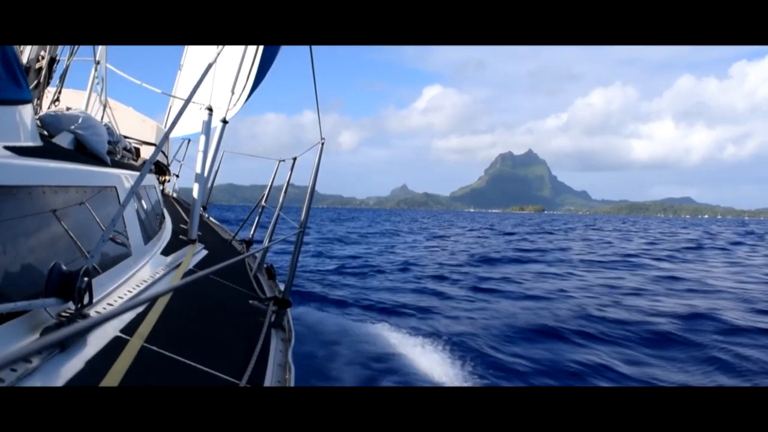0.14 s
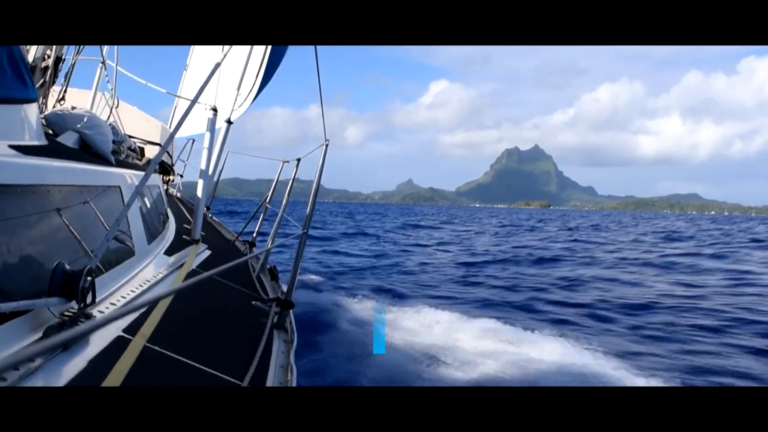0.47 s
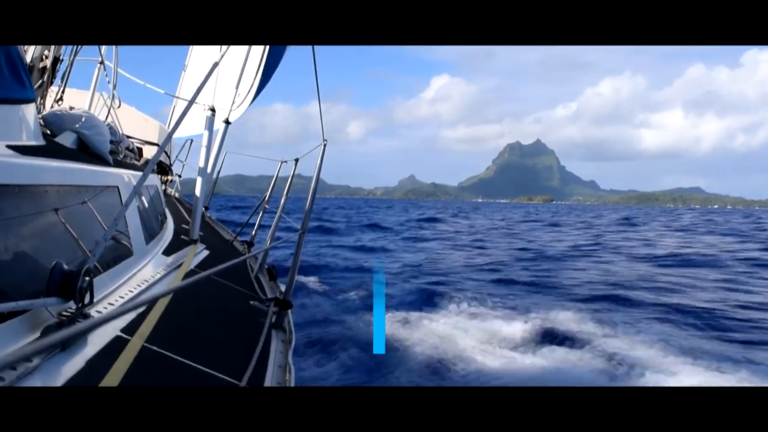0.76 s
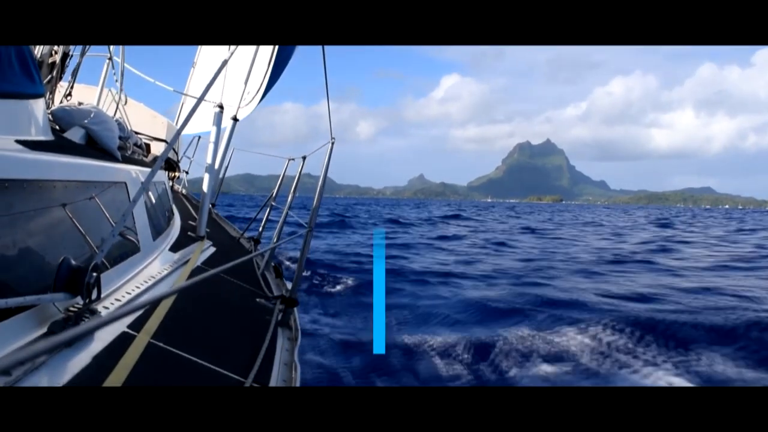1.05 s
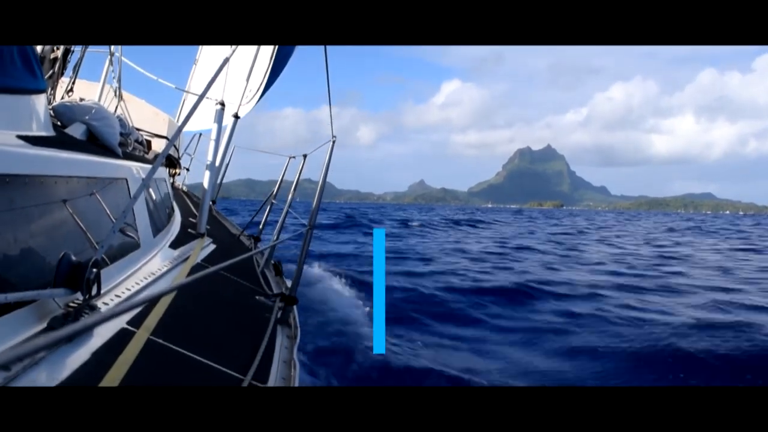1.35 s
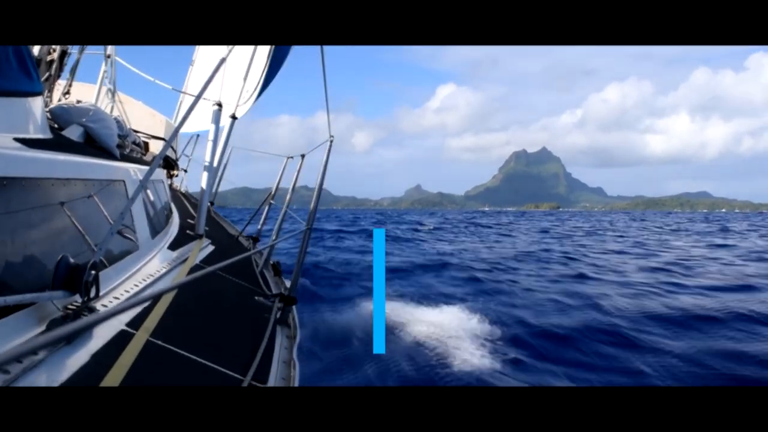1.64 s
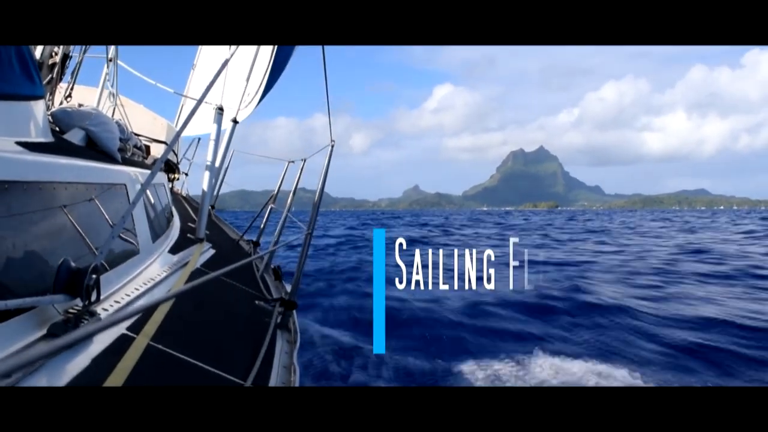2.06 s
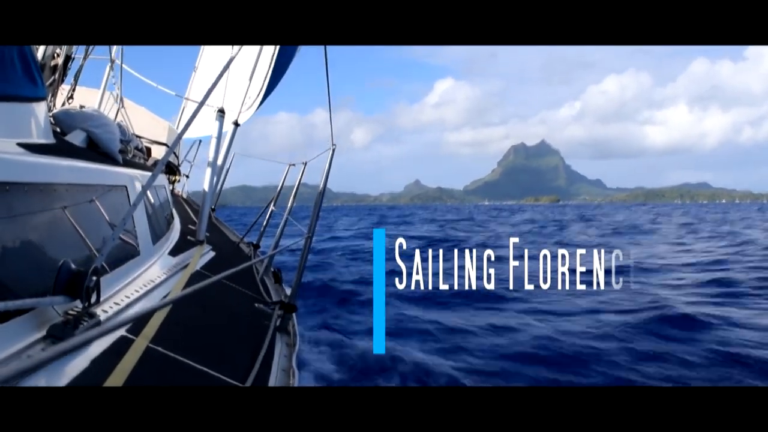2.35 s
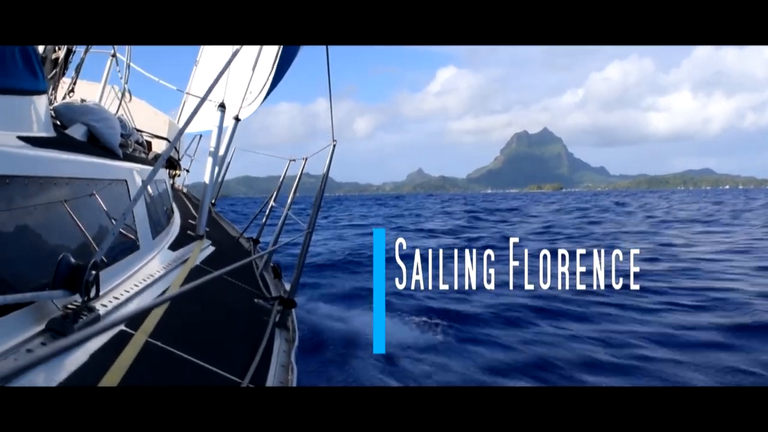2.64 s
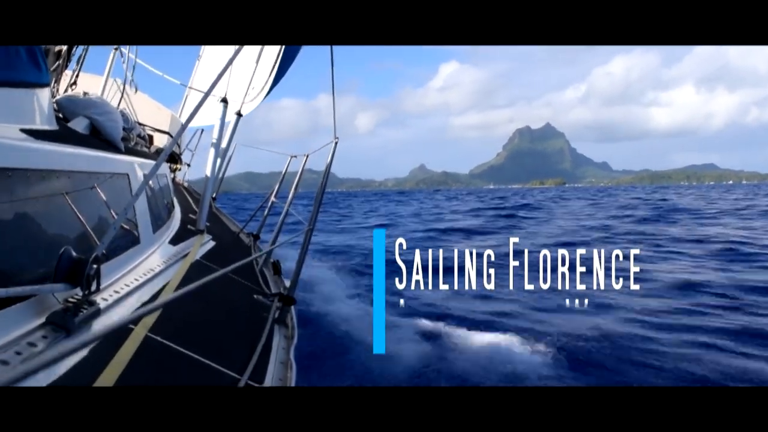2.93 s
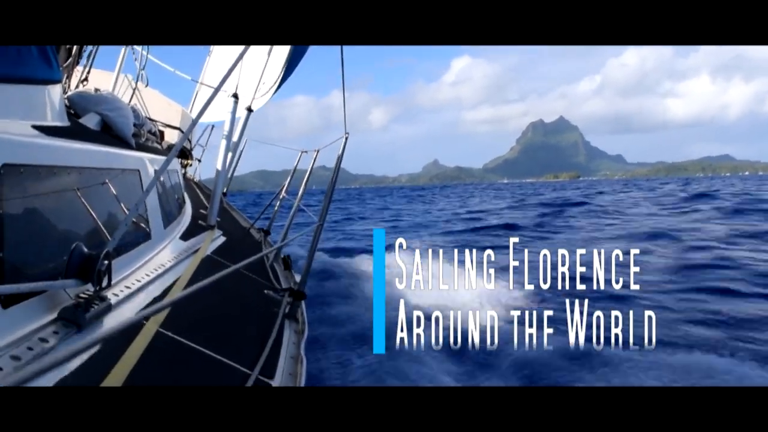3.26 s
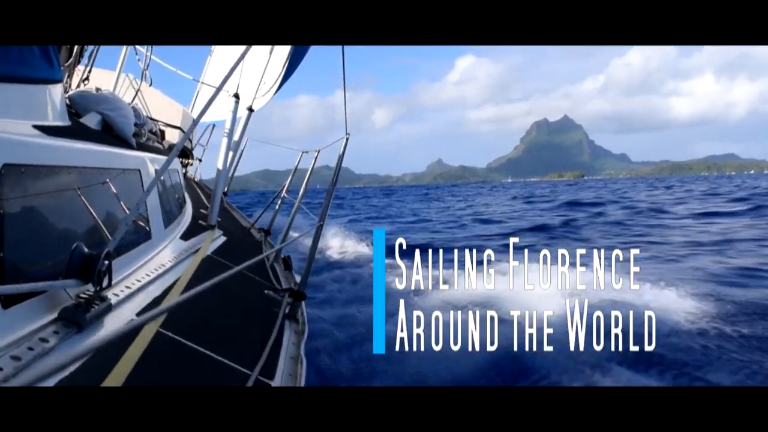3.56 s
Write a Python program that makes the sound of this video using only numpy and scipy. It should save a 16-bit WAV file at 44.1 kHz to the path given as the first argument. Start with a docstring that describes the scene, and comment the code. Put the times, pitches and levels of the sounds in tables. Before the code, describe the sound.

Water rushing past a moving sailing boat, splashing, fizzing and bubbling in uneven swells

```python
"""Sea water rushes along the hull of a sailing boat: shaped noise and clouds of damped sines form its bubbles.
A wave breaks at once with roar, fizz and spray, over the hull's rumble, amid loud single bubbles (damped
sines) and bursts of drops (noise). From 0.13 s wind gusts thump the microphone as short low pulses. After a
lull near 1.2 s the water swells again; at 2.7 s a fitting ticks once (decaying modes), and the water rises
towards the end. A steady hiss of water further off lies beneath it all."""
import sys
import numpy as np
from scipy import signal
from scipy.fft import rfft, irfft, next_fast_len
from scipy.io import wavfile
from scipy.ndimage import uniform_filter1d, map_coordinates

SR = 44100
rng = np.random.default_rng(int(sys.argv[2]) if len(sys.argv) > 2 else 0)


def voltage_ratio(decibels):
    """Convert decibels (scalar or array-like) to amplitude ratios, 20 dB per decade."""
    exponent = np.asarray(decibels, float) / 20
    return 10 ** exponent


def output_pcm(signal):
    """Save a mono or channel-first signal as 16-bit PCM at the path in sys.argv[1].

    Samples are clipped to [-1, 1] before scaling.
    """
    pcm = np.clip(np.atleast_2d(signal).T, -1, 1) * 32767
    wavfile.write(sys.argv[1], SR, np.round(pcm).astype(np.int16))


N = 163170  # length [samples]

# Breaking wave: (time [s], roar of large bubbles [dB], fizz of small foam [dB], spray hiss [dB])
WASH_LEVELS = [(0, -25, -34, -30.5), (.04, -37.5, -34, -34.5), (.12, -24.5, -20.5, -27),
               (.21, -24.5, -24.5, -30.5), (.42, -34, -29, -34), (.65, -32.5, -33, -41),
               (.76, -35, -35, -38), (.9, -39, -36.5, -45.5), (1.06, -46, -40.5, -50.5),
               (1.3, -43.5, -41, -48.5), (1.5, -35.5, -32, -45), (1.67, -27.5, -27.5, -39.5),
               (1.78, -32.5, -30.5, -42), (1.92, -28.5, -30.5, -41), (2.13, -29.5, -28.5, -41),
               (2.44, -30.5, -31.5, -44), (2.68, -41, -36, -49), (2.8, -36.5, -37, -46.5),
               (3.18, -44.5, -33, -47), (3.26, -36, -32, -44.5), (3.56, -37, -32, -43),
               (3.66, -31.5, -27, -41.5), (3.7, -34, -31, -41)]
# Low rumbles: (time [s], rumble of the hull [dB], deep rumble of the wind [dB])
RUMBLE_LEVELS = [(0.0, -30, -52), (0.18, -40, -44), (0.4, -44.5, -50.5), (0.69, -40.5, -57),
                 (0.82, -47, -58), (0.96, -44, -42), (1.23, -49, -82), (1.48, -43.5, -70), (1.53, -32, -60),
                 (1.76, -40, -58), (1.81, -51, -74), (1.94, -38, -52.5), (2.8, -50, -68),
                 (2.97, -41.5, -56), (3.04, -47, -82), (3.15, -44.5, -72), (3.36, -42, -58),
                 (3.43, -44, -77), (3.48, -45.5, -46), (3.7, -37, -76)]
# Bubbles between rumble and fizz: (time [s], low gurgle [dB], middling bubbles [dB])
GURGLE_LEVELS = [(0.0, -29, -26), (0.03, -23.5, -28.5), (0.15, -31.5, -21.5), (0.19, -23.5, -25),
                 (0.28, -33, -30), (0.33, -25, -23), (0.57, -40.5, -37.5), (0.86, -44, -37.5),
                 (0.95, -42, -43), (0.97, -48, -42.5), (1.29, -44.5, -43.5), (1.62, -42, -33),
                 (2.44, -36, -39.5), (2.64, -45.5, -38.5), (3.36, -36.5, -38), (3.44, -44, -35.5),
                 (3.66, -35, -33.5), (3.68, -40, -36)]
# Tints of the water: (time [s], hollow band in the roar [dB], finest foam [dB])
COLOUR_LEVELS = [(0, -40, -31.5), (.1, -44, -31), (.19, -32, -29.5), (.55, -36, -32.5), (.59, -29, -37),
                 (.65, -35, -35.5), (.92, -38, -39.5), (.96, -43, -44.5), (1.29, -50, -40),
                 (1.68, -28, -35.5), (1.73, -41, -37.5), (2.04, -36, -33), (2.6, -40, -40.5),
                 (3.04, -40.5, -42), (3.64, -36, -37), (3.7, -27, -33)]
# Colour of the water as the microphone hears it: (frequency [Hz], relative density [dB per Hz])
WATER_SPECTRUM = [(15, -71), (25, -47.5), (140, -6.5), (193, -4.5), (274, -6.5), (445, -2), (648, -3.5),
                  (722, -5.5), (848, -4), (997, -6), (1530, -6), (1710, -7.5), (2060, -5.5), (4040, -21),
                  (4870, -28), (9050, -36), (15500, -50.5)]
# Hollow band in the roar: (frequency [Hz], relative density [dB per Hz])
HOLLOW_SPECTRUM = [(500, -55), (740, -16.5), (800, 2), (860, 2.5), (930, -0.5), (1000, -10), (1500, -73)]
# Water further off: (frequency [Hz], relative density [dB per Hz])
SEA_SPECTRUM = [(180, -63), (300, -4.5), (601, -11), (659, -26), (1720, -5.5), (2600, -18), (2950, 2),
                (4140, -9), (12000, -32), (15600, -64), (22000, -120)]
# Crossovers between the size classes of the water, low to high: (frequency [Hz])
SPLIT_HZ = [110, 300, 490, 1000, 1700, 2600, 4200]
# Loud single bubbles: (time [s], level [dB], starting pitch [Hz])
SINGLE_BUBBLES = [(.025, -21.5, 405), (.067, -16, 662), (.092, -14, 2030), (.131, -12, 1130),
                  (0.204, -22, 483), (.316, -15, 557), (.345, -23, 513), (.557, -15.5, 619),
                  (.578, -13, 817), (.9885, -29, 2750), (1.095, -23, 970), (1.202, -27.5, 660),
                  (1.457, -29, 770), (1.615, -17.5, 800), (1.661, -20.5, 659), (1.878, -15, 833),
                  (1.918, -24, 513), (1.965, -11, 1990), (2.015, -16, 717), (2.328, -19.5, 522),
                  (3.142, -19, 1350)]
# Bursts of drops: (time [s], level [dB], decay by 60 dB [s], centre [Hz])
DROP_BURSTS = [(.565, -33, .12, 2900), (.635, -33, .15, 2500), (.885, -35, .12, 2500),
               (1.2, -38, 0.15, 1700), (0.9885, -32, 0.12, 2800), (2.716, -28, 0.11, 2150)]
# Spectrum of a burst: (frequency [multiple of its centre], relative density [dB per Hz])
DROP_SPECTRUM = [(.3, -40), (.6, -9), (.9, 0), (1.1, -2), (1.6, -14), (2.3, -32), (2.8, -27), (3.2, -40),
                 (5, -70)]
# Wind thumps: (time of the middle [s], level [dB], pitch [Hz], Gaussian half-length at 1/e [s])
WIND_THUMPS = [(0.129, -27.5, 200, .008), (0.538, -27, 151, 0.0056), (0.686, -40, 90, .012),
               (0.914, -23, 200, 0.0018), (.9375, -26, 260, .0015), (.9465, -20, 230, 0.0017),
               (.9665, -28, 190, .002), (1.006, -29, 150, .003), (1.0315, -34, 200, .002),
               (1.0475, -30, 150, .005), (1.58, -37, 170, 0.015), (1.82, -30, 178, 0.0077),
               (3.49, -41, 81.4, 0.012), (3.548, -33.5, 109, .007)]
# Turbulence around each thump: (frequency [Hz], relative density [dB per Hz])
THUMP_SPECTRUM = [(15, -56), (25, -26), (43, -15), (90, -18), (226, 11), (450, -11), (580, -33),
                  (990, -120)]
# Modes of the fitting: (frequency [Hz], relative level [dB], decay by 60 dB [s])
FITTING_MODES = [(900, -8, .012), (2060, 0, .013), (4300, -24, .008), (5250, -20, .012), (7800, -23, .012)]

PATCH_DB, SURGE_DB = .75, .45  # rms depth of the noise patches, scale of the shared surges
BUBBLE_SHARE, SPREAD_DB = .38, 1.5  # bubbles' rms relative to the noise, mean spread of bubble sizes
PITCH_RISE, SINGLE_CYCLES = .1, 14  # rise of a bubble's pitch per lifetime, lifetime of a single bubble [periods]
SEA_DB, TURBULENCE_DB = -48, -13  # far water; turbulence relative to its thump
BURST_RISE_S, BURST_HOLD_S = .0015, .012
TICK_S, TICK_DB = 2.7127, -10
MIC_LOW_HZ = 30


def unit(x):
    """Normalisation: a signal is scaled to an rms of 1."""
    return x / np.sqrt(np.mean(x ** 2) + 1e-20)


def white():
    """White noise: equal mean power at every frequency."""
    return rng.standard_normal(N)


def coloured(x, spectrum, share=lambda hz: 1):
    """Linear filtering: x passes a (Hz, dB) spectrum, times an amplitude share, and leaves at rms 1."""
    size = next_fast_len(N + 8192)
    hz = np.fft.rfftfreq(size, 1 / SR) + 1  # the offset keeps the logarithm finite
    points_hz, points_db = np.transpose(spectrum)
    gain = voltage_ratio(np.interp(np.log(hz), np.log(points_hz), points_db))
    return unit(irfft(rfft(x, size) * gain * share(hz), size)[:N])


def water_band(x, band):
    """Complementary crossovers: the power shares of all bands, counted from the lowest, add up to one."""
    edges = np.r_[1e-6, SPLIT_HZ, np.inf]
    below = lambda hz, edge: 1 / (1 + (hz / edge) ** 6)
    share = lambda hz: np.sqrt(below(hz, edges[band + 1]) - below(hz, edges[band]))
    return coloured(x, WATER_SPECTRUM, share)


def curves(rows):
    """Linear interpolation: one value per sample for each column after the time."""
    time, *columns = np.transpose(rows)
    return [np.interp(np.arange(N) / SR, time, column) for column in columns]


def wobble(rate):
    """Band-limited fluctuation: a spline through random knots, rate of them a second."""
    knots = rng.standard_normal(int(N * rate / SR) + 4)
    return map_coordinates(knots, [np.arange(N) * rate / SR])


def patchy():
    """Nonstationary noise: white noise with random gain in patches of time and frequency."""
    grid = signal.stft(rng.standard_normal(N + 512), nperseg=512)[2]
    field = uniform_filter1d(rng.standard_normal(grid.shape), size=6, axis=0)
    field = uniform_filter1d(field, size=8, axis=1)
    return unit(signal.istft(grid * voltage_ratio(PATCH_DB * unit(field)), nperseg=512)[1][:N])


def bubbles(start_s, size, hz, cycles, count):
    """Damped resonance: sines with a soft start and rising pitch, count samples at most."""
    periods = np.arange(count) / SR * hz[:, None]
    life = periods / cycles
    envelope = size[:, None] * np.exp(-2 * life) * (1 - np.exp(-2 * periods))
    ring = envelope * np.sin(2 * np.pi * periods * (1 + PITCH_RISE * life / 2))
    ring = ring * (life < 3)  # cut after three lifetimes
    at = np.round(start_s * SR).astype(int)[:, None] + np.arange(count)
    return np.bincount(at.ravel(), ring.ravel(), N + count)[:N]


def foam(number, lo_hz, hi_hz, cycles, count):
    """Superposition: many random bubbles, spread evenly over time and a band, join patchy noise."""
    when, pitch, luck = rng.random((number, 3)).T
    hz = lo_hz + (hi_hz - lo_hz) * pitch
    size = voltage_ratio(-SPREAD_DB * np.log(1 - luck)) * np.sqrt(hz)
    return patchy() + BUBBLE_SHARE * unit(bubbles(when * N / SR, size, hz, cycles, count))


def rumble():
    """Amplitude modulation: two low noise bands, wind below hull, swell in shared random lumps."""
    hull_db, wind_db = curves(RUMBLE_LEVELS)
    lumps_db = 1.1 * wobble(9)
    wind_rumble = voltage_ratio(wind_db + 0.33 * lumps_db) * water_band(white(), 0)
    return wind_rumble + voltage_ratio(hull_db + lumps_db) * water_band(patchy(), 1)


def wash():
    """Bubble resonance: size classes of the same churning water fill adjoining bands and surge together."""
    roar_db, fizz_db, spray_db = curves(WASH_LEVELS)
    gurgle_db, middling_db = curves(GURGLE_LEVELS)
    hollow_db, fine_db = curves(COLOUR_LEVELS)
    surge_db = SURGE_DB * (wobble(7.27) + wobble(30.36))
    flicker_db = 0.71 * wobble(31.78)  # of the spray alone
    large = foam(4900, 250.3, 2003, cycles=13.3, count=1000)
    small = foam(5000, 1297, 3280, cycles=10.6, count=700)
    fine = foam(5000, 2006, 5610, cycles=8.2, count=350)
    spray = foam(20000, 3140, 15200, cycles=8, count=120)
    # the lower, larger bubbles surge half as deep
    out = voltage_ratio(gurgle_db + surge_db / 2) * water_band(large, 2)
    out += voltage_ratio(roar_db + surge_db / 2) * water_band(large, 3)
    out += voltage_ratio(hollow_db + surge_db / 2) * coloured(white(), HOLLOW_SPECTRUM)
    out += voltage_ratio(middling_db + surge_db) * water_band(large, 4)
    out += voltage_ratio(fizz_db + surge_db) * water_band(small, 5)
    out += voltage_ratio(fine_db + surge_db) * water_band(fine, 6)
    return out + voltage_ratio(spray_db + surge_db + flicker_db) * water_band(spray, 7)


def far_sea():
    """Stationary noise: water further off blends into a steady hiss."""
    return voltage_ratio(SEA_DB) * coloured(white(), SEA_SPECTRUM)


def single_bubbles():
    """Damped resonance: the loudest bubbles ring one by one."""
    start_s, db, hz = np.transpose(SINGLE_BUBBLES)
    return bubbles(start_s, voltage_ratio(db), hz, SINGLE_CYCLES, count=3500)


def wind():
    """Zero net pressure: each gust is one short low suck wrapped in a lump of turbulence."""
    t, out = np.arange(N) / SR, np.zeros(N)
    turbulence = voltage_ratio(TURBULENCE_DB) * coloured(white(), THUMP_SPECTRUM)
    for middle_s, db, hz, length in WIND_THUMPS:
        u = t - middle_s
        balance = np.exp(-(np.pi * hz * length) ** 2)  # cancels the mean of the pulse
        suck = np.exp(-(u / length) ** 2) * (balance - np.cos(2 * np.pi * hz * u))
        lump = np.exp(-(u / (4 * length)) ** 2)
        out += voltage_ratio(db) * (lump * turbulence + suck)
    return out


def drop_bursts():
    """Exponential decay: noise bursts of drops start sharply, hold briefly and die away."""
    t, out = np.arange(N) / SR, np.zeros(N)
    for start_s, db, t60, hz in DROP_BURSTS:
        u = t - start_s
        rise = np.clip(u / BURST_RISE_S, 0, 1)
        fall = voltage_ratio(db - 60 * np.clip(u - BURST_HOLD_S, 0, 1) / t60)
        out += rise * fall * coloured(patchy(), np.multiply(DROP_SPECTRUM, [hz, 1]))
    return out


def tick():
    """Modal decay: a small hard fitting knocks once and its modes ring out."""
    out, t = np.zeros(N), np.arange(2000) / SR
    ring = sum(voltage_ratio(db - 60 * t / t60) * np.sin(2 * np.pi * hz * t) for hz, db, t60 in FITTING_MODES)
    soft_start = 1 - np.exp(-t / .0007)
    out[round(TICK_S * SR):][:len(t)] = voltage_ratio(TICK_DB) * ring * soft_start
    return out


def scene():
    """Linear superposition: the pressures of all sources add into one channel."""
    water = rumble() + wash() + far_sea() + single_bubbles()
    return (water + wind() + drop_bursts() + tick())[None]


def roll_off(x):
    """The treble ends steeply here."""
    return signal.sosfilt(signal.butter(12, 15650, fs=SR, output="sos"), x)


def record(dry):
    """High-pass filtering: the microphone's bass cut."""
    cut = signal.butter(2, MIC_LOW_HZ, "high", fs=SR, output="sos")
    mix = signal.sosfilt(cut, dry)
    return roll_off(mix)


dry = scene()
out = record(dry)
output_pcm(out)
```